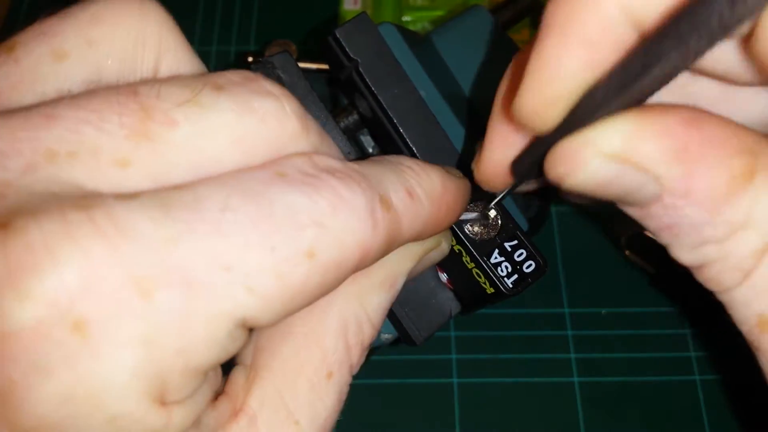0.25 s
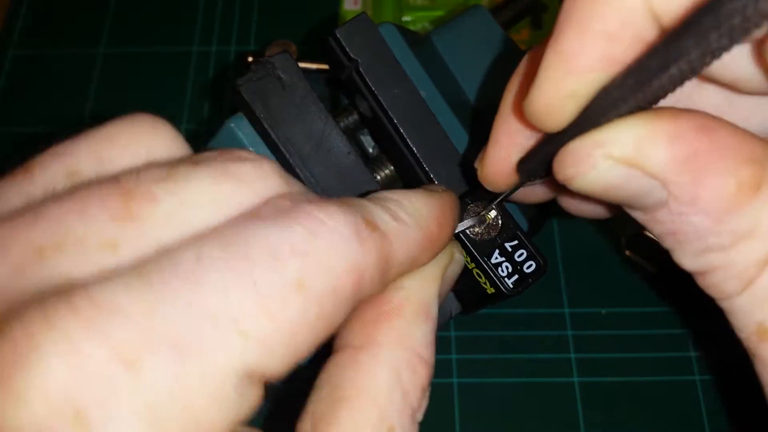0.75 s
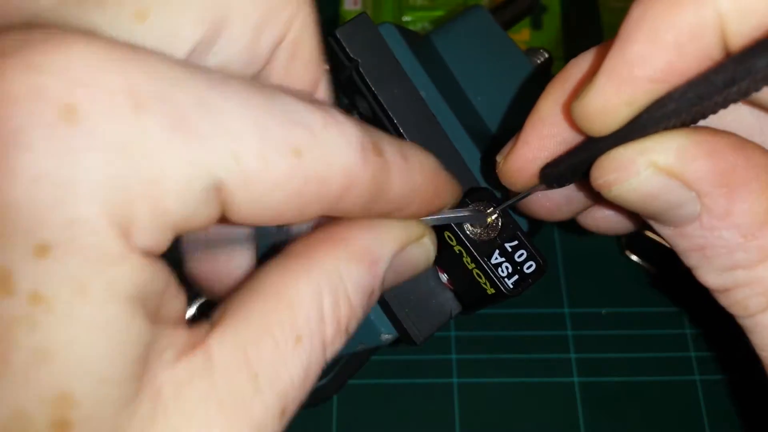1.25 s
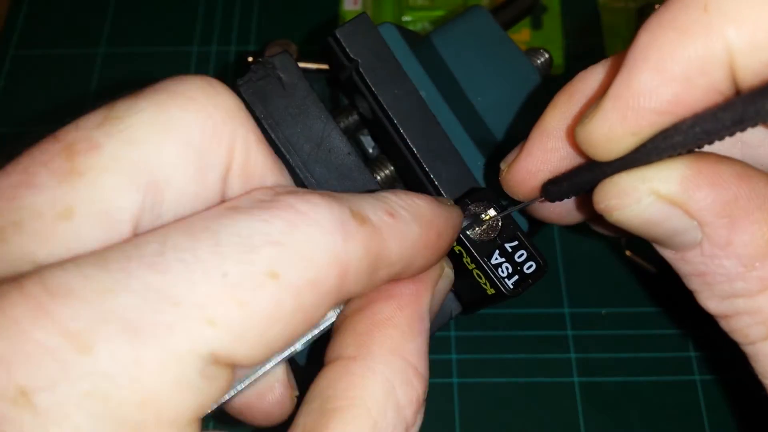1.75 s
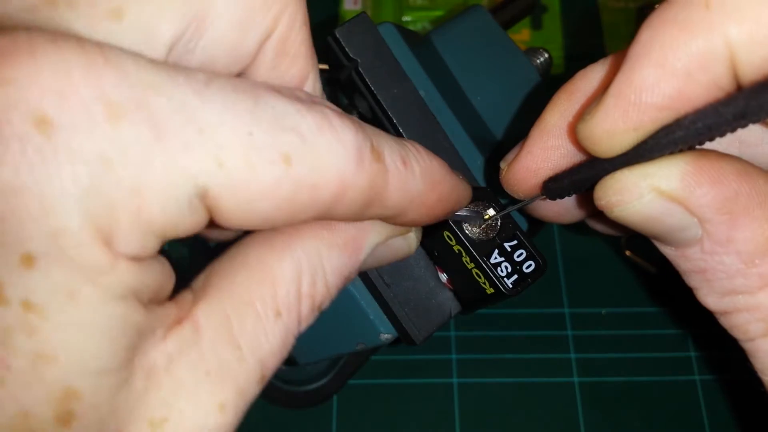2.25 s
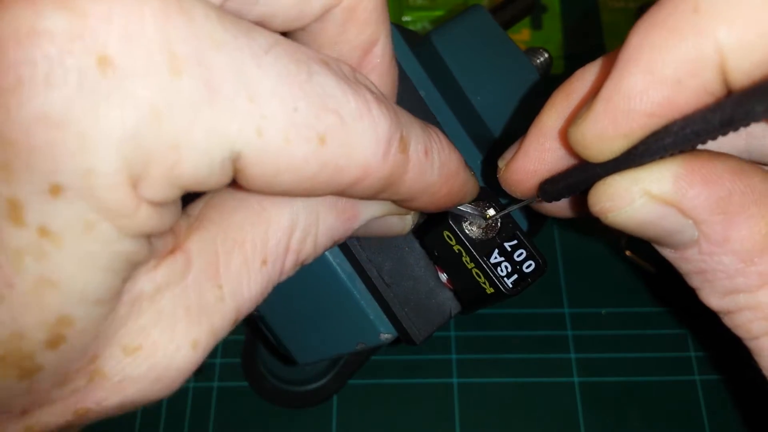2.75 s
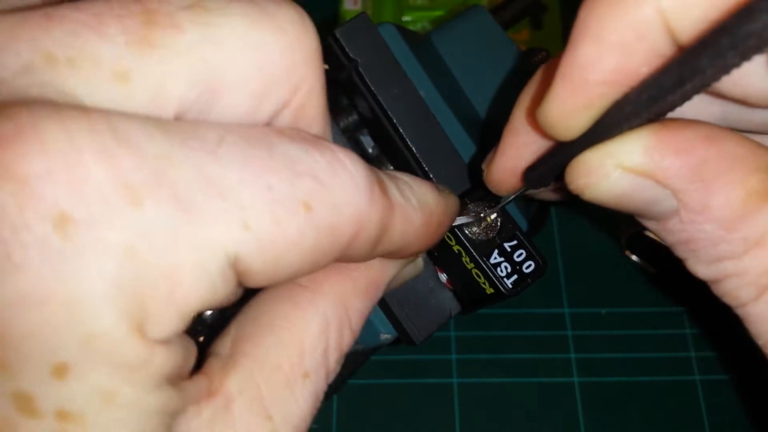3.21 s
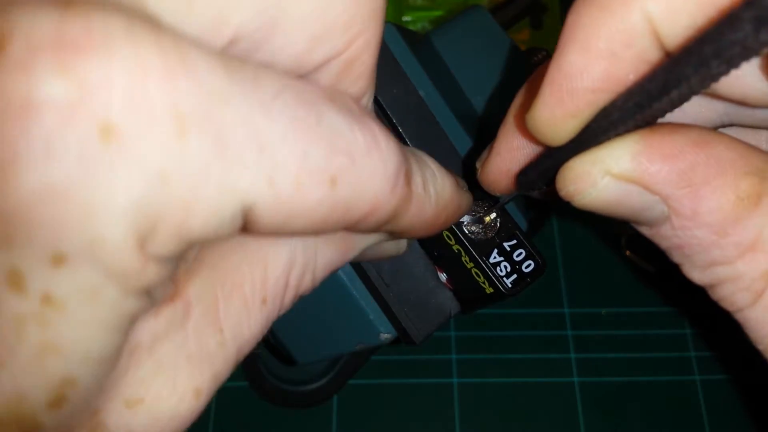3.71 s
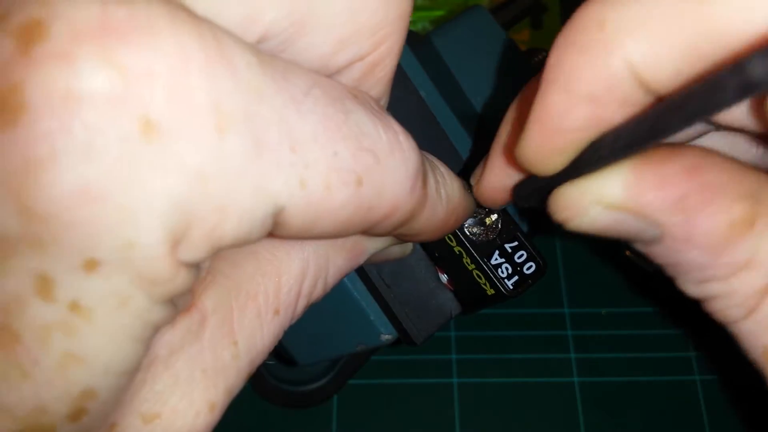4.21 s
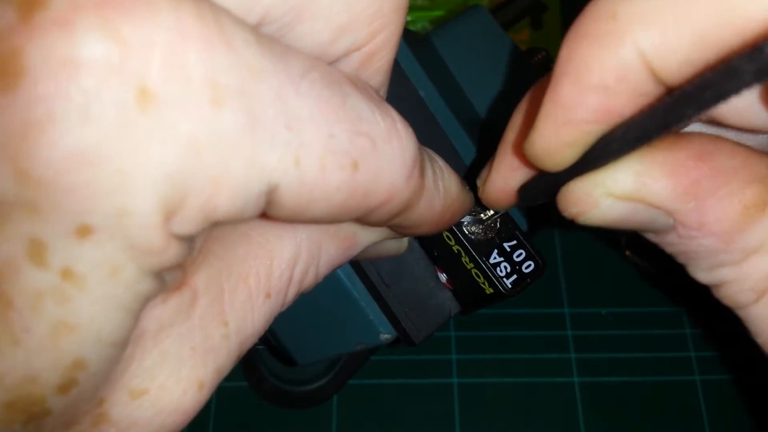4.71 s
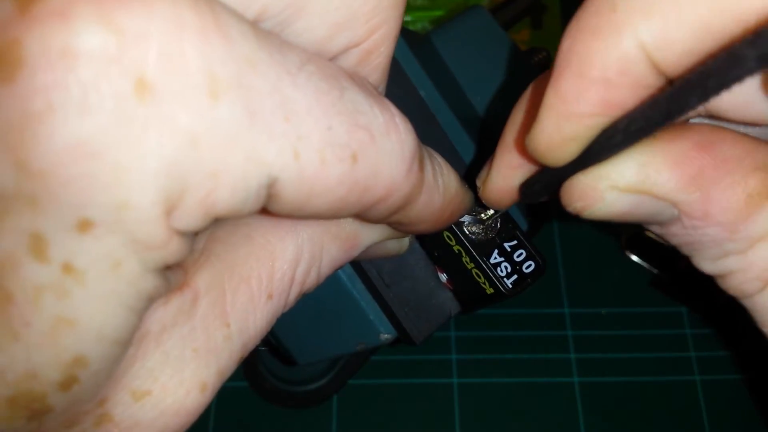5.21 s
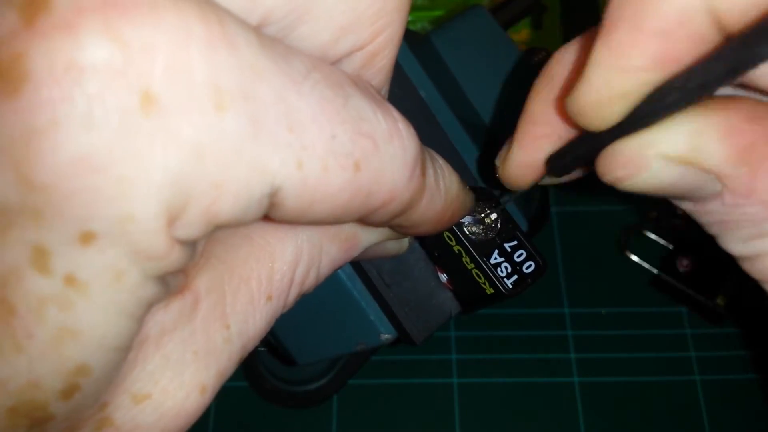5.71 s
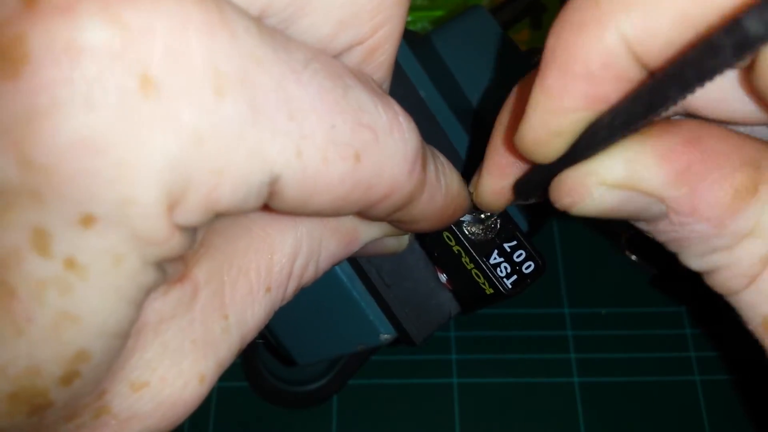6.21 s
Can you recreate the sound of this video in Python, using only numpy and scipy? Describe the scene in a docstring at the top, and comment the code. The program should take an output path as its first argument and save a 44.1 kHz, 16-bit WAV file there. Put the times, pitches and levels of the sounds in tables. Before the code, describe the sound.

A steel rake pick works inside a small padlock clamped in a vise. It begins with scattered sharp clicks and tiny scrapes, eases off briefly, then settles into a rhythm of snaps and knocks that thickens into a dense metallic rattle. A few soft thumps come from the bench. The sound is close, in a small room, over a low motor hum and faint hiss.

```python
"""Raking a clamped padlock

A steel rake works in a small padlock clamped in a bench vise, close to two microphones in a small room.
Its teeth scrape (trains of stick-slip jumps) and snap over the pins (short ringing blows); knocks on the
lock body excite damped modes. Single probing clicks come first, then a rhythm, then a dense rattle.
Shoves thump the bench; a motor hums as wavering harmonics over a shaped noise of air and microphone hiss."""
import sys
import numpy as np
from scipy import signal
from scipy.fft import rfft, irfft
from scipy.io import wavfile

SR = 44100
rng = np.random.default_rng(int(sys.argv[2]) if len(sys.argv) > 2 else 0)


def transcribe(u):
    """Save the signal u as a 16-bit wav file named by the first command-line argument.

    u: samples, shape (n,) or (channels, n), limited to [-1, 1]; the rate is SR.
    q: integer samples, one column per channel.
    """
    v = np.clip(np.atleast_2d(u).T, -1, 1)
    q = np.round(v * 32767).astype(np.int16)
    wavfile.write(sys.argv[1], SR, q)


N = 284886

# teeth snapping off pins: (time [s], relative level [dB], pitch of the ring [Hz], brightness [dB])
SNAPS = [(0.1144, -36, 7350, -1), (0.3453, -42, 8500, 5), (0.4124, -29, 6800, 0), (0.4164, -21.5, 7800, -2),
         (0.4427, -28, 6500, 3), (0.5237, -29.5, 8800, 9), (0.5878, -18.5, 8150, 3),
         (0.594, -23.5, 4700, -5), (0.601, -28.5, 7450, 1), (0.632, -33, 6100, -6),
         (0.9416, -27.5, 4670, 0.5), (1.0017, -25.5, 8600, 8), (1.253, -37.5, 4990, 2),
         (2.846, -37.5, 4140, -6), (3.1166, -25.5, 9000, 3), (3.457, -23.5, 4340, -10),
         (4.204, -18, 8850, -4), (4.2167, -24.5, 6200, 1), (4.2702, -24, 5700, -6),
         (4.2823, -19.5, 8000, -1), (4.3273, -28, 5030, 1), (4.4442, -21.5, 8210, 3), (4.458, -32, 8900, 1),
         (4.487, -21, 8000, -12), (4.655, -18.5, 8700, 10), (4.7553, -36, 5400, -4),
         (4.7764, -29.5, 6800, 0), (4.7893, -30, 6500, 9), (4.9332, -24.5, 6500, 9),
         (4.9595, -37.5, 6650, -11), (5.1184, -29, 6950, 7), (5.139, -21, 6600, 4.5),
         (5.2615, -23.5, 6960, 5), (5.3447, -33, 5600, 0), (5.3826, -25, 8100, 3), (5.487, -22, 5730, -6.5),
         (5.53, -22, 5470, -6), (5.5487, -21, 7100, 9), (5.5562, -21, 7510, -3), (5.589, -26, 4840, -17),
         (5.6023, -22.5, 5580, -11), (5.6121, -14.5, 8400, 1), (5.669, -31, 7360, 4),
         (5.7613, -25, 6820, 1), (5.7772, -23.5, 7250, 1), (5.7824, -21, 5450, -7), (5.7918, -25, 6350, -4),
         (5.8347, -21.5, 8730, -2), (5.8456, -16, 5330, -4), (5.9216, -26.5, 6050, 4),
         (6.005, -25, 6500, 2), (6.0959, -26, 6350, 8), (6.1178, -20, 5646, 10), (6.128, -20, 5200, -10),
         (6.1835, -22.5, 6260, -14), (6.2047, -14.5, 5400, -24), (6.2636, -26.5, 6500, -9),
         (6.3551, -26.5, 9300, 4), (6.383, -26, 5600, -4), (6.3894, -18.5, 5550, -2),
         (6.41, -23.5, 5720, -1), (6.4207, -22, 7600, 5), (6.4316, -22, 6700, -6)]
# rake or tension wrench hitting the lock body: (time [s], relative level [dB], hardness [dB/octave])
KNOCKS = [(0.1228, -45, -1), (0.1563, -46, -2), (0.3955, -46, -2), (0.4167, -28, 4.5), (0.5237, -37, 2),
          (0.635, -46.5, 1.5), (0.9809, -36, 3), (1.355, -45, 0), (1.377, -43.5, -1.5), (1.4917, -40.5, 0),
          (1.7244, -45.5, 1), (2.192, -49.5, -1), (3.0095, -32.5, -2), (3.1083, -34, 7.5),
          (3.1832, -40.5, 7.5), (3.3967, -43.5, -1.5), (3.4581, -42.5, -1.5), (3.5925, -54.5, -2.5),
          (4.129, -31, 7), (4.2846, -42, -1.5), (4.3986, -40.5, -2), (4.4865, -25.5, 5.5),
          (4.7125, -29.5, 5.5), (4.8394, -30, 5.5), (5.0144, -30, 5.5), (5.1886, -33.5, 1),
          (5.2624, -51, -5.5), (5.4058, -26.5, 8.5), (5.4871, -36.5, 5.5), (5.613, -27, 6), (5.861, -28, 9),
          (6.0056, -33, 8.5), (6.2186, -25, 12)]
# rake sliding over the pins: (start [s], end [s], relative level [dB], swell from start to end [dB])
STROKES = [(0.403, 0.418, -40, 8), (0.583, 0.607, -35, -1), (1.346, 1.372, -48.5, -7),
           (4.196, 4.226, -41, 3), (4.264, 4.285, -37, 0), (4.477, 4.505, -35.5, -8),
           (4.648, 4.664, -48, -2), (4.915, 4.937, -46, 12), (5.259, 5.273, -40.5, -5.5),
           (5.501, 5.564, -35.5, 6), (5.582, 5.611, -39.5, 9), (5.749, 5.796, -36.5, -1),
           (5.838, 5.863, -29, 13), (6.093, 6.155, -36, 3), (6.178, 6.221, -29.5, 13.5),
           (6.36, 6.432, -37.5, -4)]
# modes of the steel rake blade: (frequency [Hz], level [dB], t60 [s])
BLADE_MODES = [(4960, 2, 0.0086), (5500, -15, 0.011), (5930, -15, 0.028), (6600, 2.5, 0.018),
               (7230, 2, 0.025), (8060, -27, 0.038)]
# rings of the pins a stroke passes: (frequency [Hz])
PINS_HZ = [4700, 5600, 5550, 6500]
# close sounds favour the right microphone: (frequency [Hz], left minus right [dB])
NEAR_BALANCE = [(200, -3), (1300, -5.5), (2700, -1.5), (4400, -6), (8000, -7.5), (15000, -13)]
# balance of hum and rush: (frequency [Hz], left minus right [dB])
RUSH_BALANCE = [(60, -.5), (110, -3), (200, -4.5), (380, -1), (700, -4), (1300, -2), (2400, -2), (4400, -6),
                (8000, -11), (15000, -5)]


def amp(db):
    """Decibels to gain."""
    return 10 ** (np.asarray(db) / 20)


def evened(x):
    """Scales to an rms of 1."""
    return x / np.sqrt(np.mean(x ** 2) + 1e-20)


def unit(x):
    """Scales to a mean energy of 1 per channel."""
    return evened(x) / np.sqrt(x.shape[-1])


def read(points, hz):
    """Interpolates a spectrum on a log-frequency axis."""
    f, value = np.transpose(points)
    return np.interp(np.log(hz + 1), np.log(f), value)


def bins(size):
    """Bin frequencies of a spectrum of that many samples."""
    return np.fft.rfftfreq(size, 1 / SR)


def sides(balance, hz):
    """Left and right levels in dB for a balance spectrum."""
    return np.array([[.5], [-.5]]) * read(balance, hz)


def add(mix, s, sound):
    """Mixes a sound in at time s."""
    part = mix[:, round(s * SR):][:, :sound.shape[-1]]
    part += sound[..., :part.shape[-1]]


def colour(x, db):
    """Minimum-phase filter with the given gain at each bin: nothing sounds before a blow."""
    mirrored_db = np.r_[db, db[-2:0:-1]]
    phase = -signal.hilbert(np.log(amp(mirrored_db))).imag[:len(db)]
    return irfft(rfft(x) * amp(db) * np.exp(1j * phase))


def peak(hz, pitch_hz, ring_db, ring_width_hz):
    """Resonance of a pin, as dB over frequency."""
    return ring_db / (1 + ((hz - pitch_hz) / ring_width_hz) ** 2)


def convolve(x, response):
    """Passes each channel through its response."""
    return signal.fftconvolve(x, response, axes=1)[:, :N]


def drift(hz):
    """Slow random signal of rms 1, up to about hz."""
    noise = rfft(rng.standard_normal(N))
    return evened(irfft(noise * np.exp(-(bins(N) / hz) ** 2), N))


def ring(modes, t, spread, uneven_db=0):
    """Dying modes; strength can vary per blow, and each reaches the two microphones with its own phase."""
    out = 0
    for hz, db, t60 in modes:
        strength = amp(db + uneven_db * rng.standard_normal() - 60 * t / t60)
        phase = spread * rng.standard_normal((2, 1))
        out = out + strength * np.sin(2 * np.pi * hz * t + phase)
    return out


def contact(t, chatter, chatter_s, scatter, scatter_s):
    """A sharp blow, a brief chatter of metal on metal, and scatter off fingers and vise."""
    a, b = rng.standard_normal((2, 2, len(t)))
    chattering = chatter * unit(a * np.exp(-t / chatter_s))
    scattering = scatter * unit(b * np.exp(-t / scatter_s))
    return unit((t == 0) + chattering + scattering)


def snaps(level_db=20.0, ring_db=7, ring_width_hz=600, blade_db=-12, bright_hz=10500, drag_db=-12, drag_s=0.0019):
    """A tooth drags briefly up a pin; the pin springs back with a very short ring and sets the blade singing."""
    # (frequency [Hz], level [dB])
    snap_colour = [(100, -39.5), (700, -13), (1500, -19.5), (2900, -16.5), (3900, -7), (5200, 0),
                   (7000, -2), (9000, -1), (11500, -5), (15000, -5.5)]
    jolt_db, jolt_hz, jolt_bright_db = -1.5, 6600, -8  # every knock jolts a pin; level relative to the knock
    t, hz, out = np.arange(4096) / SR, bins(size=4096), np.zeros((2, N))
    lead = 160  # samples of drag before the snap
    jolts = [(s, db + jolt_db, jolt_hz, jolt_bright_db) for s, db, _ in KNOCKS]
    for s, db, pitch_hz, bright_db in SNAPS + jolts + catches():
        blow = np.roll(contact(t, chatter=1.97, chatter_s=0.00077, scatter=0.77, scatter_s=0.004), lead, axis=1)
        drag = rng.standard_normal((2, lead)) * np.exp(t[:lead] / drag_s)
        blow[:, :lead] += amp(drag_db) * unit(drag)
        pin = peak(hz, pitch_hz, ring_db, ring_width_hz)
        treble = bright_db * (1 + np.tanh((hz - bright_hz) / 2000)) / 2
        snap = unit(colour(blow, read(snap_colour, hz) + pin + treble))
        blade = unit(ring(BLADE_MODES, t, spread=1.56, uneven_db=5))
        add(out, s - lead / SR, amp(db + level_db) * snap)
        add(out, s, amp(db + level_db + blade_db) * blade)
    return out


def catches(teeth_per_s=125, level_db=6, spread_db=2, bright_db=-2.5, clear_s=0.0045):
    """Lesser snaps, in rows like SNAPS: teeth pass the pins at a roughly even rate, clear of the listed snaps."""
    listed_s = np.array([row[0] for row in SNAPS])
    rows = []
    for start, end, db, swell_db in STROKES:
        chance = rng.random((16, 3))  # at most 16 teeth per stroke
        for k, (late, force, pin) in enumerate(chance):
            s = start + (k + late / 2) / teeth_per_s
            if s < end and abs(s - listed_s).min() > clear_s:
                swelling = swell_db * ((s - start) / (end - start) - .5)
                level = db + level_db + swelling + spread_db * (2 * force - 1)
                rows.append((s, level, PINS_HZ[int(pin * len(PINS_HZ))], bright_db))
    return rows


def scrapes(slips_per_s=2200, size_db=3.5, level_db=0.5, blade_db=-9, ring_db=9, ring_width_hz=450, grip_db=3):
    """Under a stroke the rake sticks and slips in tiny uneven jumps, gripping and releasing pins at random."""
    # (frequency [Hz], level [dB])
    scrape_colour = [(100, -17), (350, -15.5), (750, -10.5), (1100, -12.5), (1600, -10.5), (2900, -15.5),
                     (3900, -6.5), (5400, -8), (7000, -11), (9000, -4.5), (11500, -10), (15000, -5.5)]
    # the tip skids around every knock; level relative to the knock
    skid_before_s, skid_after_s, skid_db = 0.006, 0.0022, -13.5
    slips = np.zeros((1, N))
    grip = amp(grip_db * drift(hz=130))
    skids = [(s - skid_before_s, s + skid_after_s, db + skid_db, 0) for s, db, _ in KNOCKS]
    for start, end, db, swell_db in STROKES + skids:
        n = max(round((end - start) * SR), 100)
        sizes = amp(size_db * np.minimum(rng.exponential(1, n), 3)) * rng.choice([-1, 1], n)
        pressure = signal.windows.tukey(n, .25) * amp(swell_db * np.arange(n) / n)
        train = sizes * (rng.random(n) < slips_per_s / SR) * pressure
        gripped = train * np.resize(grip[round(start * SR):], n)
        add(slips, start, amp(db + level_db) * evened(gripped))
    t, hz, out = np.arange(4096) / SR, bins(size=4096), 0
    dwell = 300  # samples, about 7 ms on each pin
    touched = rng.integers(0, len(PINS_HZ), N)[np.arange(N) // dwell]
    for pin, pitch_hz in enumerate(PINS_HZ):
        shape = read(scrape_colour, hz) + peak(hz, pitch_hz, ring_db, ring_width_hz)
        slip = unit(colour(contact(t, chatter=0.46, chatter_s=0.0022, scatter=0.4, scatter_s=0.0032), shape))
        blade = amp(blade_db) * unit(ring(BLADE_MODES, t, spread=3.8))
        out = out + convolve(slips * (touched == pin), slip + blade)
    return out


def knocks(level_db=26.0, modes_db=-5, vise_db=2, pivot_hz=1600, soft_top_hz=3500, cushion_db=-3, muffle_db=14,
           muffle_hz=2500):
    """Blows on the lock body: hard ones clack; finger-cushioned ones are muffled and ring low in the vise."""
    # (frequency [Hz], level [dB])
    knock_colour = [(40, -20), (100, -9.5), (350, -4.5), (500, -12.5), (750, 10.5), (1050, -7.5), (1550, 3),
                    (2250, 0), (3200, -2.5), (4000, -11), (6500, -14), (10000, -26), (15000, -30)]
    # modes of the lock body: (frequency [Hz], level [dB], t60 [s])
    lock_modes = [(725, -4, 0.14), (1223, 7, 0.031), (1619, 4.5, 0.047), (2047, -5, 0.035),
                  (2275, -4.5, 0.027), (2845, -1, 0.027), (3230, -8.5, 0.036)]
    # modes of the vise jaws: (frequency [Hz], level [dB], t60 [s])
    vise_modes = [(480, -17, 0.06), (730, -6, 0.088), (875, 7, 0.046), (1010, -6, 0.022),
                  (1233, -2.5, 0.055)]
    t, hz, out = np.arange(8192) / SR, bins(size=8192), np.zeros((2, N))
    octaves = np.log2(np.clip(hz, 600, soft_top_hz) / pivot_hz)
    treble = 1 - 1 / (1 + (hz / muffle_hz) ** 8)
    for s, db, hardness in KNOCKS:
        # a long, soft push moves the heavy jaws; below about -3.7 dB/octave the sign flips and treble rises
        cushioned = 1 / (-0.5 + np.exp(hardness - cushion_db))
        blow = contact(t, chatter=2.0, chatter_s=0.0028, scatter=1.83, scatter_s=0.0039)
        crack = unit(colour(blow, read(knock_colour, hz)))
        body = crack + amp(modes_db) * unit(ring(lock_modes, t, spread=0.82, uneven_db=1.0))
        clack = unit(colour(body, hardness * octaves - cushioned * muffle_db * treble))
        jaws = cushioned * amp(vise_db) * unit(ring(vise_modes, t, spread=0.88))
        add(out, s, amp(db + level_db) * (clack + jaws))
    return out


def bench(rise_s=0.0055, level_db=4):
    """Hard shoves rock the heavy vise on its bench, which answers slowly with a low thump."""
    # (time [s], relative level [dB])
    shoves = [(0.42, -42), (0.509, -48), (1.618, -50), (1.721, -56), (4.268, -45.5), (4.491, -46),
              (5.601, -45.5), (5.854, -46.5), (6.214, -42.5)]
    # modes of the bench: (frequency [Hz], level [dB], t60 [s])
    bench_modes = [(107.9, 2, 0.43), (180.4, 6, 0.13), (259.4, 2.5, 0.11), (352, -2.5, 0.125)]
    t, out = np.arange(SR // 2) / SR, np.zeros((2, N))
    for s, db in shoves:
        thump = (1 - np.exp(-t / rise_s)) * ring(bench_modes, t, spread=0.28)
        add(out, s, amp(db + level_db) * thump)
    return out


def near(x, level_db=-1):
    """The direct path from the lock to the two microphones."""
    return irfft(rfft(x) * amp(level_db + sides(NEAR_BALANCE, bins(N))), N)


def room(x, turns_per_s=.9):
    """Two sets of echoes trade places cyclically, so that each blow's room tail differs."""
    angle = 2 * np.pi * turns_per_s * np.arange(N) / SR
    return convolve(x * np.cos(angle), echoes()) + convolve(x * np.sin(angle), echoes())


def echoes(build_s=0.0032, wet_db=0, balance_share=0.43):
    """Echoes of a small room thicken over the first moments; each band dies at its own speed."""
    # (frequency [Hz], t60 [s])
    room_t60 = [(200, 1.5), (600, 0.42), (1500, 0.34), (4000, 0.3), (8000, 0.34), (15000, 0.37)]
    # (frequency [Hz], echo level [dB])
    room_colour = [(40, -8), (110, 6), (200, 8.5), (800, -3.5), (2000, -6.5), (4000, -8), (6500, -10),
                   (10000, -11), (15000, -12)]
    hz, t, z = signal.stft(rng.standard_normal((2, SR // 2)), SR, nperseg=256)
    t60 = read(room_t60, hz)[:, None]
    tail = signal.istft(z * amp(-60 * t / t60) / np.sqrt(t60), SR, nperseg=256)[1]
    size = tail.shape[1]
    build = 1 - np.exp(-(np.arange(size) / SR / build_s) ** 2)
    tail = unit(tail * build)
    hz = bins(size)
    return irfft(rfft(tail) * amp(wet_db + read(room_colour, hz) + balance_share * sides(NEAR_BALANCE, hz)))


def hum(motor_hz=48.87, waver_db=1.0, wander=0.013, level_db=0):
    """Harmonics of a motor turning almost steadily (wander in turns), each wavering a little in level."""
    # (multiple of the turning rate, level [dB])
    harmonics = [(1, -66), (2, -54), (3, -49.5), (4, -58), (5, -49.5), (7, -64), (8, -62), (9, -66.5),
                 (10, -65.5), (11, -66.5), (12, -77), (13, -85), (14, -69)]
    turns = motor_hz * np.arange(N) / SR + wander * drift(hz=.7)
    out = np.zeros((2, N))
    for order, db in harmonics:
        line = np.sqrt(2) * np.sin(2 * np.pi * (order * turns + rng.random()))
        waver = waver_db * drift(hz=5.1)
        out += line * amp(level_db + db + waver + sides(RUSH_BALANCE, order * motor_hz))
    return out


def rush(level_db=-47):
    """Shaped noise: low rush of air, alike on both sides at the bottom, and microphone hiss that is not."""
    # (frequency [Hz], relative density [dB per Hz])
    rush_colour = [(20, -17), (45, -26), (70, -12.5), (100, -4.5), (130, -3.5), (190, -5.5), (270, 0),
                   (330, -8.5), (500, -14), (800, -16), (1500, -24), (3000, -27), (4500, -25.5),
                   (7000, -20.5), (9500, -32.5), (15500, -31.5)]
    # (frequency [Hz], left-right likeness [0..1])
    likeness = [(60, 1), (130, 0.019), (290, 0.15), (640, 0.00062), (1400, 0)]
    hz = bins(N)
    a, b = rfft(rng.standard_normal((2, N)))
    same = np.clip(read(likeness, hz), -1, 1)
    pair = np.array([a, same * a + np.sqrt(1 - same ** 2) * b])
    shaped = pair * amp(read(rush_colour, hz) + sides(RUSH_BALANCE, hz))
    return amp(level_db) * evened(irfft(shaped, N))


def scene():
    """The lock, near and through the room, and the bench, near only, over a background that sinks at the end."""
    # background gain: (time [s], level [dB])
    background_db = [(0, 1), (5.5, 0.5), (5.95, -4), (6.45, -7)]
    lock = snaps() + scrapes() + knocks()
    fade = amp(np.interp(np.arange(N) / SR, *np.transpose(background_db)))
    background = (hum() + rush()) * fade
    return near(lock + bench()) + room(lock) + background


def record(dry, ceiling=.7, edge_hz=15850):
    """The input rounds the sharpest peaks; then a low-pass limits the band."""
    rounded = ceiling * np.tanh(dry / ceiling)
    lowpass = signal.firwin(255, edge_hz, window=("kaiser", 8), fs=SR)
    return signal.oaconvolve(rounded, lowpass[None], "same")


dry = scene()
out = record(dry)
transcribe(out)
```